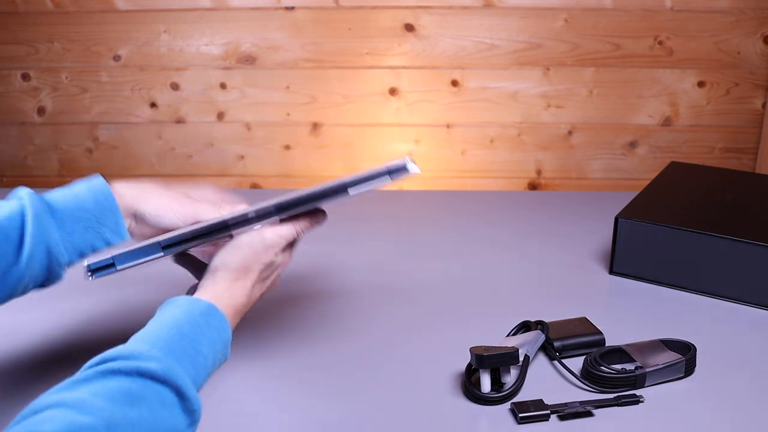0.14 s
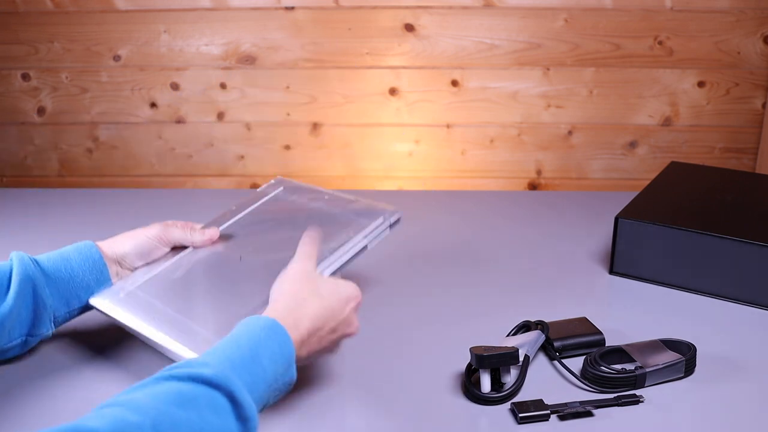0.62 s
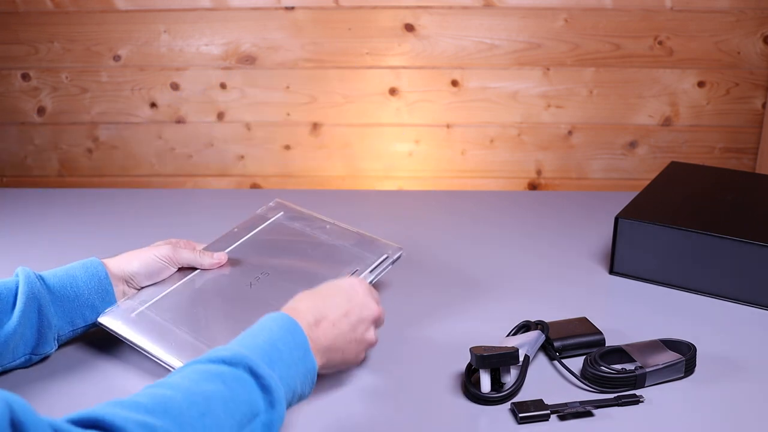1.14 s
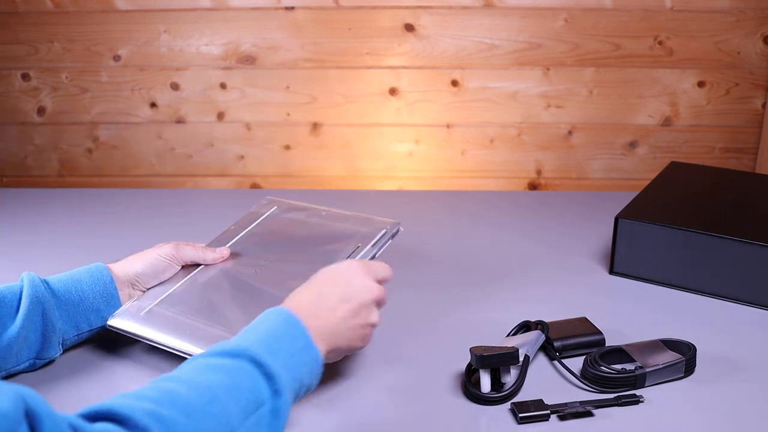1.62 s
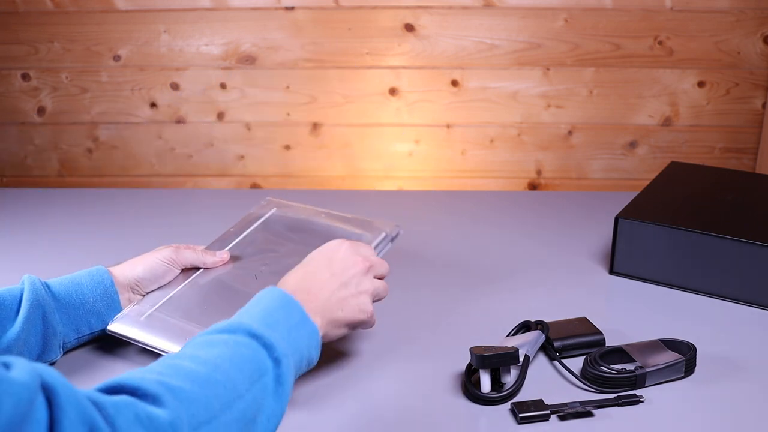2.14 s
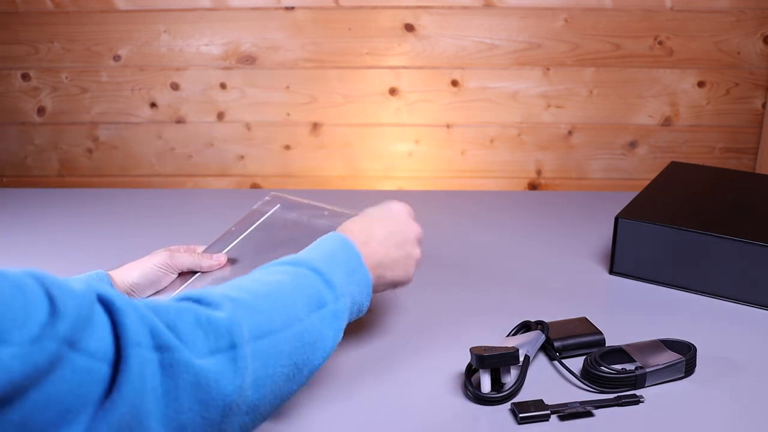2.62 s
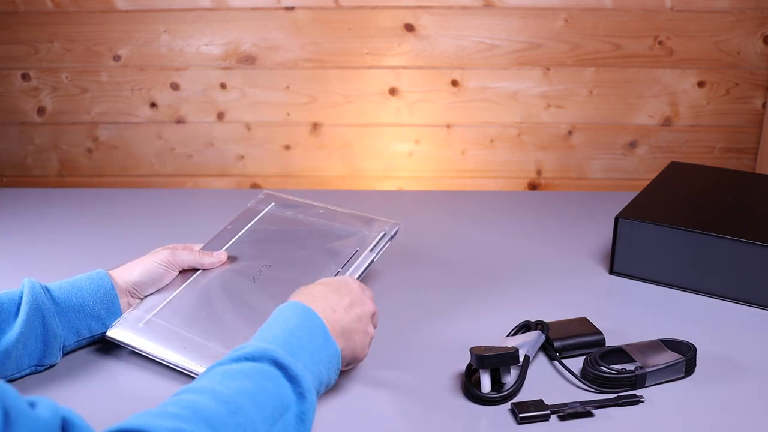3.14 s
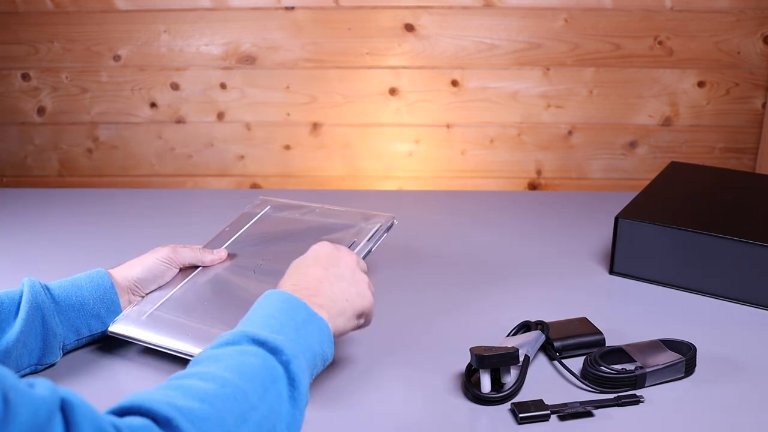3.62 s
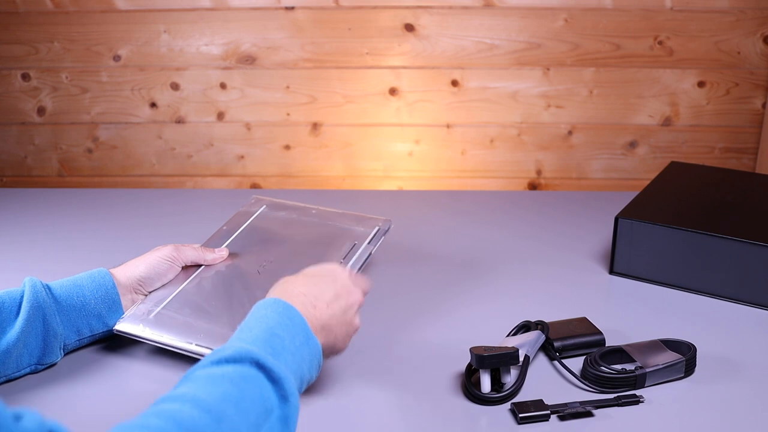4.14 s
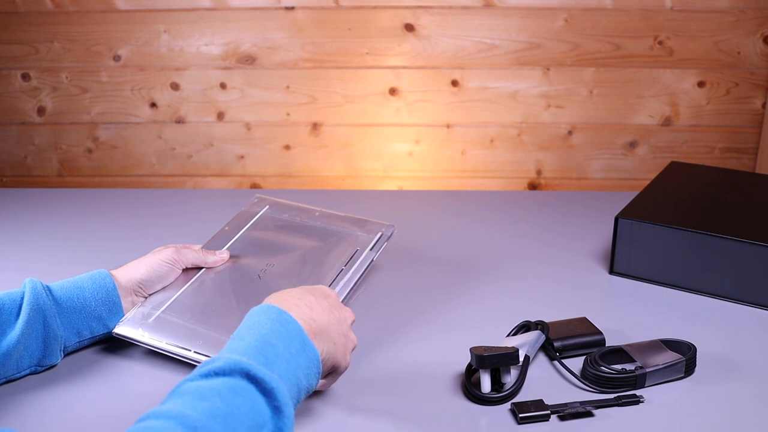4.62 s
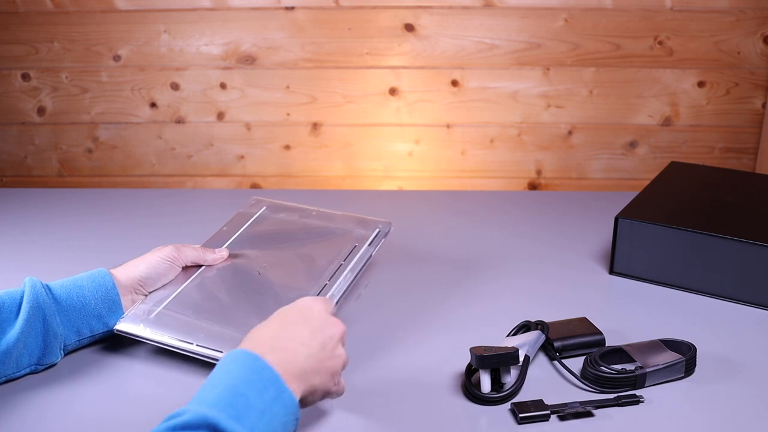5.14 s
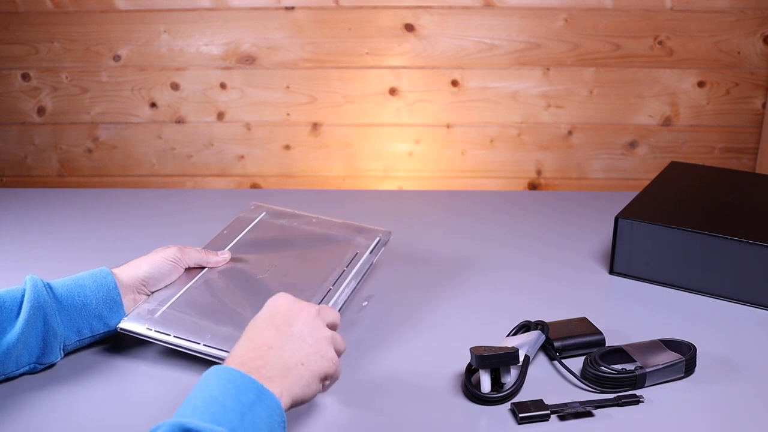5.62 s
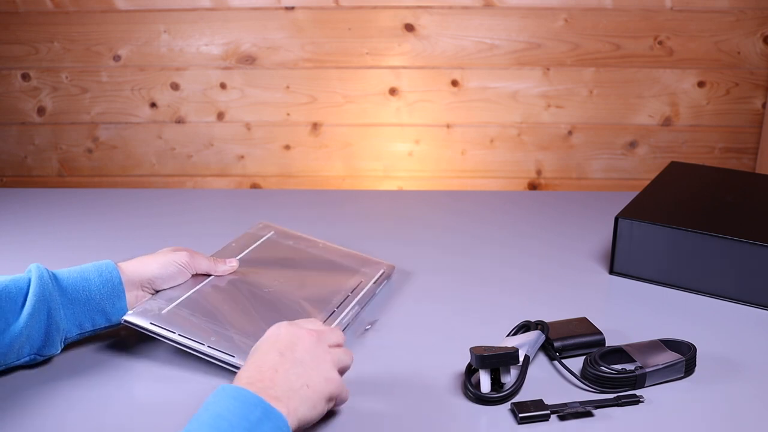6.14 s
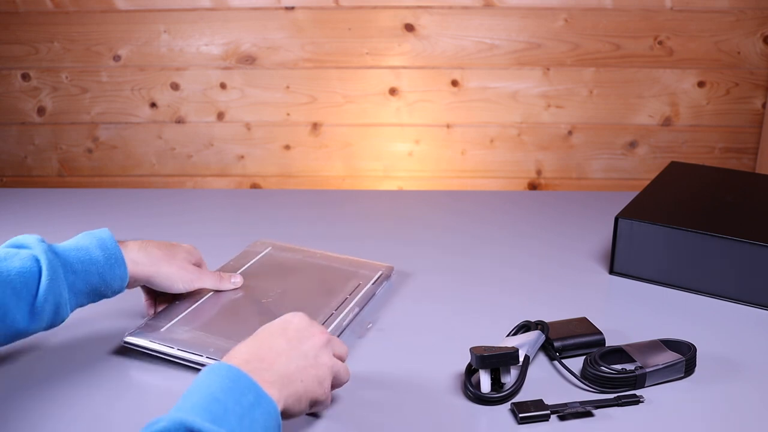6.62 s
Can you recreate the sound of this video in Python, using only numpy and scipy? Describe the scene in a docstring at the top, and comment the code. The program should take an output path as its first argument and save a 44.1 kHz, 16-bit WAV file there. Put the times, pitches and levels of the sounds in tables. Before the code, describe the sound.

Dry, irregular snaps of plastic wrap over faint skin rustle and dull rubbing, with small hollow thumps from the laptop lid. Crackling swells twice, its hardest pops slightly overloading the microphone, then quietens. The laptop edge bumps the table with a few smaller knocks, followed by a soft slide. Close, in a small quiet room.

```python
"""Hands picking at film on a laptop

Hands pick at stiff plastic film wrapped round a slim laptop, over a table in a small wooden room.
Creases snap as coloured noise bursts with a lid thud; fingers and palm hiss as shaped noise over a dull rub;
taps ring the lid's modes, edge knocks ring the table's, and narrow-band noise squeaks.
Walls answer about 5 ms later; the loudest snaps overload the microphone input."""
import sys
import numpy as np
from scipy import signal
from scipy.fft import rfft, irfft, next_fast_len
from scipy.io import wavfile
from scipy.ndimage import uniform_filter1d, map_coordinates

SR = 44100
rng = np.random.default_rng(int(sys.argv[2]) if len(sys.argv) > 2 else 0)


def decibels_to_gain(level_db):
    """Convert a level in decibels to a linear amplitude gain (20 dB per decade)."""
    exponent = np.asarray(level_db, float) / 20
    return 10 ** exponent


def materialize(psi):
    """Save the field psi as 16-bit PCM at rate SR to the path in sys.argv[1].

    A 1-D psi becomes a single channel; in a 2-D psi each row is a channel.
    """
    bounded = np.clip(np.atleast_2d(psi).T, -1, 1)
    quanta = np.round(bounded * 32767).astype(np.int16)
    wavfile.write(sys.argv[1], SR, quanta)


N = 297675  # samples

# Modes of the laptop's lid under the film. Each row: frequency in Hz, relative level in dB, t60 in seconds.
LID_MODES = [(384.5, -3, .028), (635, 4.5, .017), (807, 2, .011), (1096, 1.5, 0.013)]
# Spectrum of skin on film. Each row: frequency in Hz, relative density in dB per Hz.
FILM_SPECTRUM = [(600, -39), (1500, -5), (3000, 3.5), (6000, 3.5), (9000, 0.5), (11000, -0.5),
                 (13500, -1.5), (18000, 13)]


def unit(x):
    """Scales to rms 1."""
    return x / np.sqrt(np.mean(x ** 2) + 1e-20)


def along(points, hz):
    """Reads (Hz, value) points on a log frequency axis."""
    f, v = np.transpose(points)
    return np.interp(np.log(hz + 1), np.log(f + 1), v)


def coloured(x, spectrum):
    """Filters x by a (Hz, dB) spectrum."""
    m = next_fast_len(N + 8192)
    gain = decibels_to_gain(along(spectrum, np.fft.rfftfreq(m, 1 / SR)))
    return irfft(rfft(x, m) * gain, m)[..., :N]


def coloured_noise(spectrum):
    """Steady noise of rms 1 with a (Hz, dB) spectrum."""
    return unit(coloured(rng.standard_normal(N), spectrum))


def wobble(knots_per_s):
    """A smooth random curve through normal knots."""
    knots = rng.standard_normal(int(N * knots_per_s / SR) + 4)
    return map_coordinates(knots, [np.arange(N) * knots_per_s / SR])


def swell(middle_s, length_s):
    """A Gaussian rise and fall, length_s between its 1/e points."""
    t = np.arange(N) / SR
    return np.exp(-((t - middle_s) / (length_s / 2)) ** 2)


def place(seconds, sounds):
    """Sums rows of short sounds onto the time line."""
    at = np.round(seconds * SR).astype(int)[:, None] + np.arange(sounds.shape[1])
    return np.bincount(at.ravel(), sounds.ravel(), N + sounds.shape[1])[:N]


def ring(modes, strengths, attack_s):
    """One row per blow: decaying sine modes at the given strengths, with a soft onset."""
    hz, db, t60_s = np.transpose(modes)[:, :, None]
    t = np.arange(SR // 4) / SR
    onset = 1 - np.exp(-t / attack_s)
    decay = decibels_to_gain(db - 60 * t / t60_s)
    return strengths @ (decay * np.sin(2 * np.pi * hz * t) * onset)


def causal(gain):
    """Minimum phase: the response with this gain that starts no earlier than its cause."""
    cepstrum = irfft(np.log(gain))
    half = cepstrum.shape[1] // 2
    fold = np.r_[1, 2 * np.ones(half - 1), 1, np.zeros(half - 1)]
    return np.exp(rfft(cepstrum * fold))


def room(x):
    """Near walls, each scattering over about a millisecond, plus a tail with a decay per frequency."""
    # Decay of the tail. Each row: frequency in Hz, t60 in seconds.
    tail_decay = [(200, 0.09), (1000, 0.17), (4000, 0.18), (9000, 0.16), (15000, 0.17)]
    # First wall reflections. Each row: delay in seconds, level in dB.
    reflections = [(.0049, -8.5), (.0058, -20), (.0072, -14), (.0084, -9.5), (0.0123, -13), (.0125, -32.5),
                   (.015, -31.5)]
    hz, t, z = signal.stft(rng.standard_normal(SR // 2), SR, nperseg=256)
    decay = decibels_to_gain(-60 * t / along(tail_decay, hz)[:, None])
    tail = signal.istft(z * decay, SR, nperseg=256)[1]
    tail = decibels_to_gain(-4.0) * tail / np.linalg.norm(tail)
    answer = np.pad(tail, (round(0.0045 * SR), 0))
    fade = np.exp(-np.arange(128) / SR / 0.00043)
    for delay_s, db in reflections:
        scatter = fade * rng.standard_normal(len(fade))
        answer[round(delay_s * SR):][:len(fade)] += decibels_to_gain(db) * scatter / np.linalg.norm(scatter)
    return signal.fftconvolve(x, answer)[:N]


def room_from_spots(seconds, sounds, spots):
    """Deals the sounds out over several spots, each with its own room response."""
    return sum(room(place(seconds[k::spots], sounds[k::spots])) for k in range(spots))


def quiet_air():
    """Steady low noise of the quiet room."""
    # Each row: frequency in Hz, relative density in dB per Hz.
    air_spectrum = [(15, -26), (30, 12.5), (60, 4.5), (130, 4.5), (400, -5.5), (900, -35), (1500, -36),
                    (5000, -49)]
    return decibels_to_gain(-56.0) * coloured_noise(air_spectrum)


def rustle_db(s):
    """How busily the fingers move at the given moments, as rustle level."""
    # Each row: time in seconds, rustle level in dB.
    finger_activity = [(0, -56), (.05, -76), (.45, -56), (1.0, -61), (1.32, -62.5), (1.68, -40),
                       (1.76, -44), (2.1, -45.5), (2.45, -46), (2.9, -42.5), (3.3, -51.5), (3.45, -61),
                       (3.72, -74.5), (3.8, -36.5), (4.28, -35.5), (4.43, -56), (4.52, -44.5),
                       (5.18, -46.5), (5.35, -60.5), (5.6, -57.5), (5.88, -49.5), (6.03, -67.5),
                       (6.2, -49.5), (6.74, -49.5)]
    return np.interp(s, *np.transpose(finger_activity))


def finger_rustle(busy_db):
    """Skin sliding on film: hiss with tiny clumped crackles, unevenly loud."""
    happens = rng.random(N) < .004 * decibels_to_gain(4 * wobble(20))
    sizes = decibels_to_gain(2.4 * rng.exponential(size=N))
    crackles = happens * sizes * rng.choice([-1, 1], N)
    hiss = unit(coloured(rng.standard_normal(N) + .5 * unit(crackles), FILM_SPECTRUM))
    uneven_db = 2.2 * wobble(22)
    return decibels_to_gain(busy_db + uneven_db) * hiss


def case_rub():
    """Duller, fluctuating rub of the case, rms 1."""
    # Each row: frequency in Hz, relative density in dB per Hz.
    rub_spectrum = [(100, -32), (250, -6), (600, 0), (1100, -8.5), (2000, -11), (5000, -42.5)]
    return unit(coloured(decibels_to_gain(3.5 * wobble(26)) * rng.standard_normal(N), rub_spectrum))


def taps():
    """Fingertip thumps ring the lid softly; the room answers differently from spot to spot."""
    # Each row: start in seconds, level in dB.
    thump_list = [(.002, -36.5), (0.0653, -46), (0.2757, -28), (.7695, -41.5), (1.67, -31), (1.92, -28.5),
                  (2.076, -27), (2.1015, -20.5), (2.227, -31), (2.4446, -22), (2.5959, -24.5), (2.93, -29),
                  (3.1378, -37), (3.333, -29.5), (3.398, -40), (3.797, -10), (3.8056, -21.5),
                  (3.8572, -11.5), (3.9016, -23.5), (4.015, -25.5), (4.1734, -33.5), (4.7368, -35),
                  (4.8781, -31), (5.099, -37.5), (6.363, -39)]
    s, db = np.transpose(thump_list)
    strengths = decibels_to_gain(3.9 * rng.standard_normal((len(s), len(LID_MODES))))
    thumps = decibels_to_gain(db)[:, None] * ring(LID_MODES, strengths, attack_s=0.001)
    return place(s, thumps) + decibels_to_gain(2.5) * room_from_spots(s, thumps, 5)


def small_creases():
    """Little creases at random moments, rows as in the snap list: busier fingers, stronger pops."""
    count = 260
    floor_db, scatter_db = 4, 9.5  # over the rustle level
    middle_hz, pitch_octaves = 2200, 1.43
    spread_octaves, walls_db = 0.44, 4
    even, normal = rng.random((count, 2)), rng.standard_normal(count)
    s = even[:, 0] * N / SR
    db = rustle_db(s) + floor_db + scatter_db * even[:, 1]
    hz = middle_hz * 2 ** (pitch_octaves * normal)
    same = np.ones(count)
    return np.transpose([s, db, hz, spread_octaves * same, walls_db * same])


def snaps():
    """A crease pops: a millisecond of tiny releases coloured by the film patch, and a thud of the lid."""
    # Each row: start in seconds, pop level in dB, centre in Hz, spread in octaves,
    # relative strength towards the walls in dB.
    crease_list = [(.0663, -36.5, 1030, .83, -6.5), (.2052, -31, 1020, 1.4, -1.5),
                   (0.2748, -13, 1450, 1.86, 3), (.298, -17, 1910, 1.9, 1), (.3987, -34, 7500, .9, 10.5),
                   (0.425, -25, 15290, 1, 8), (0.432, -10, 2830, 1.9, -2.5), (.7695, -39, 980, .3, 10),
                   (1.084, -36, 2200, 0.32, 4.5), (1.3023, -33.5, 15290, 1.45, 11),
                   (1.309, -31.5, 2050, .94, 4), (1.3746, -2.5, 15290, 1.05, 1.5),
                   (1.3789, -2.5, 15200, 1.28, 5.5), (1.383, -10, 7150, .58, 8.5),
                   (1.4072, -19, 9500, .45, 16), (1.4467, -24, 1370, 1.9, 2),
                   (1.4845, -29, 15290, 1.1, 12.5), (1.5577, -35, 2110, .75, 14.5),
                   (1.5647, -14, 3650, 1.17, 3), (1.604, -30.5, 1550, .75, 11.5),
                   (1.639, -21.5, 1250, .34, 4.5), (1.6506, -28, 5400, 0.59, 1.5),
                   (1.674, -24.5, 1166, 1.9, 10.5), (1.7923, -19.5, 3450, 1.2, 2),
                   (1.8331, -22, 1444, 1.2, 1), (1.853, -20, 1730, .6, -2), (1.8922, -25, 1020, .83, 10),
                   (1.918, -18.5, 3280, 1.4, 5.5), (1.9946, -14, 6650, 1.25, 3.5),
                   (2.0245, -7, 6630, .47, 6), (2.0711, -14.5, 1910, 1.4, 2), (2.075, -7.5, 1900, 1.1, -1),
                   (2.092, -2, 2040, 1.86, 6.5), (2.0995, 1.5, 15290, .6, 4), (2.1401, -17, 1020, 1.3, 8.5),
                   (2.2275, -21, 990, .96, 3.5), (2.2334, -16, 6210, .59, 6.5),
                   (2.267, -12.5, 6070, 1.3, 6.5), (2.4434, -19.5, 980, 1.7, 6),
                   (2.5842, -17.5, 5000, 1.2, 3.5), (2.5953, -12.5, 2450, 1.9, 0),
                   (2.6583, -20, 2330, .94, 6), (2.6802, -10.5, 1360, 1.34, 5),
                   (2.769, -32.5, 3080, .86, 13.5), (2.8001, -23.5, 2220, .95, 14),
                   (2.8194, -20.5, 1100, .32, 5.5), (2.837, -26, 4340, .8, 10.5),
                   (2.9217, -20.5, 2680, 1.1, 13.5), (2.928, -18, 1660, 1.55, 11),
                   (2.9392, -18, 2300, 1.9, 12.5), (2.9578, -28, 3100, 0.27, 12),
                   (2.994, -29.5, 2860, .42, 11.5), (3.032, -24, 2700, .56, 4), (3.061, -25, 2700, .79, 1),
                   (3.1373, -27.5, 1180, 1.9, -1), (3.332, -30, 1056, 1.2, 4.5),
                   (3.3486, -22, 5650, .61, 3), (3.5774, -43.5, 1046, .31, 10.5),
                   (3.7724, -50, 990, 1.1, 11.5), (3.791, -7, 3600, .76, 4), (3.7938, -3, 8190, .51, 3),
                   (3.796, 3, 4400, .89, 9.5), (3.8061, -12.5, 944, .52, 10), (3.8364, -6, 4710, 1.4, 3.5),
                   (3.8519, -3, 4420, .75, 11), (3.8575, 6, 3450, 1.9, 7.5),
                   (3.9014, -2.5, 1950, 1.4, -7.5), (3.921, -13.5, 2520, .49, 12),
                   (3.9304, -1.5, 7550, 1.2, 4.5), (3.9668, -20, 4390, .32, -4),
                   (3.9934, -12, 1080, 1.2, 8), (3.9953, -9, 2180, 1.55, 4),
                   (4.014, -21.5, 1090, 1.1, 15.5), (4.0387, -10, 5520, .95, 7.5),
                   (4.1626, -5.5, 3800, 1, 7.5), (4.1735, -16, 4710, .6, 0.5),
                   (4.2713, -24, 1010, 1.2, -4.5), (4.313, -20, 3080, 1.45, 10.5),
                   (4.3164, -14.5, 3820, 1.5, 7), (4.3463, -14, 4140, .71, -5.5),
                   (4.394, -35.5, 1100, .5, -2), (4.4787, -28, 1640, .6, 6), (4.5107, -34, 1020, 1.5, 12),
                   (4.5613, -28.5, 1310, .85, 14.5), (4.5921, -11.5, 2390, .53, 5),
                   (4.5956, -9, 3820, 1.2, 4.5), (4.687, -24, 3820, .85, 9.5),
                   (4.693, -23.5, 3830, .95, -1), (4.737, -36, 1010, .6, -5.5), (4.8424, -9, 2940, .65, 1),
                   (4.8789, -19.5, 1020, 1.2, 5.5), (4.9915, -13.5, 4620, 1.1, 5),
                   (5.0987, -16, 1550, 1.1, 3), (5.1465, -22.5, 4140, .7, 4.5),
                   (5.251, -39, 4520, .7, 11.5), (5.591, -29, 2190, 1.45, -4),
                   (5.5949, -30.5, 3880, .8, 12), (5.849, -28.5, 8000, .8, 8.5),
                   (5.8647, -24.5, 2150, .97, 9), (5.8703, -19, 2640, .42, 3),
                   (6.049, -25.5, 2980, 1.25, 8), (6.2914, -24.5, 2210, .99, 2),
                   (6.5545, -26.5, 1020, .8, 3.5), (6.7165, -35.5, 1000, 1.3, 11.5)]
    s, db, hz, octaves, walls_db = np.vstack([small_creases(), crease_list]).T[:, :, None]
    # thud re pop: broad low creases press the lid, high ones less
    thud_db = -12.5 - 6.5 * np.log2(hz / 1e3) + 0.064 * (db + 19.5)
    t, f = np.arange(512) / SR, np.fft.rfftfreq(512, 1 / SR) + 1
    chance = rng.standard_normal((len(s), len(t) + len(LID_MODES)))
    releases = chance[:, :len(t)] * np.exp(-t / .00058) * (1 - np.exp(-t / .00008))
    skirt = decibels_to_gain(-22)
    hump = np.exp(-(np.log2(f / hz) / np.clip(octaves, .3, 3)) ** 2 / 4) + skirt
    patch = causal(hump / (1 + (700 / f) ** 2))  # a small patch radiates no bass
    pop = irfft(rfft(releases) * patch)
    # level: loudest 0.5 ms rms, times root 2
    pop /= np.sqrt(uniform_filter1d(pop ** 2, size=22, axis=1).max(1, keepdims=True) * 2)
    spread = irfft(patch)  # averaged over all directions only the patch colour is left
    spread *= np.linalg.norm(pop, axis=1, keepdims=True) / np.linalg.norm(spread, axis=1, keepdims=True)
    thud = decibels_to_gain(thud_db) * ring(LID_MODES, decibels_to_gain(6.2 * chance[:, len(t):]), attack_s=0.001)
    longer = ((0, 0), (0, SR // 4 - len(t)))
    direct = decibels_to_gain(db) * (np.pad(pop, longer) + thud)
    outward = decibels_to_gain(db) * (np.pad(spread, longer) + thud)
    echoes = room_from_spots(s[:, 0], decibels_to_gain(walls_db) * outward, 8)
    return place(s[:, 0], direct) + decibels_to_gain(-3) * echoes


def palm_slides(rub):
    """A palm slides smoothly over the film: even hiss, some case rub, and low drag on the table."""
    # Each row: middle in seconds, length in seconds, hiss level in dB.
    slide_list = [(.53, 0.077, -43), (0.898, .08, -52.5), (5.295, 0.069, -47.5), (5.751, .1, -47),
                  (6.296, 0.17, -49.5), (6.445, 0.18, -33.5), (6.62, 0.084, -41), (6.74, .05, -36)]
    # Case dragging on the table. Each row: frequency in Hz, relative density in dB per Hz.
    drag_spectrum = [(15, -3), (35, 0), (60, -8), (120, -30)]
    strength = sum(decibels_to_gain(db) * swell(s, length_s) for s, length_s, db in slide_list)
    hiss = coloured_noise(FILM_SPECTRUM)
    drag = coloured_noise(drag_spectrum)
    return strength * (hiss + decibels_to_gain(-13.5) * rub + decibels_to_gain(-13) * drag)


def squeaks():
    """A fingertip squeaks on the lid: rough stick-slip tones, noise in a narrow band."""
    # Each row: middle in seconds, length in seconds, frequency in Hz, tone rms before the swell in dB.
    squeak_list = [(.535, 0.031, 1172, -45.5), (.535, 0.038, 1760, -50.5), (0.897, 0.045, 1166, -56),
                   (0.949, 0.044, 1050, -48), (1.018, 0.012, 2200, -57)]
    t = np.arange(N) / SR
    total = np.zeros(N)
    for s, length_s, hz, db in squeak_list:
        phase = 2 * np.pi * hz * t
        tone = unit(np.sin(phase) * wobble(300) + np.cos(phase) * wobble(300))
        total += decibels_to_gain(db) * tone * swell(s, length_s)
    return total


def knocks():
    """The laptop's edge bumps the table top; a softer contact wakes only the low modes."""
    # Each row: start in seconds, peak level in dB, contact hardness as cut-off in Hz.
    bump_list = [(1.0983, -21.5, 336), (5.8363, -28, 1480), (5.8395, -5.5, 1210), (5.9158, -13, 960),
                 (5.973, -30.5, 392), (6.078, -36.5, 503), (6.1437, -19.5, 1010), (6.172, -32, 300),
                 (6.187, -24.5, 500), (6.559, -26.5, 600), (6.719, -27.5, 710)]
    # Each row: frequency in Hz, relative level in dB, t60 in seconds.
    table_modes = [(75, -22, .15), (110, -20, .12), (165, -12, .11), (221, -9.5, .16), (250, -1, .014),
                   (328, -14, .06), (450, -10, .035), (657, -6, .035), (867, -4, .012), (1109, -6, .015),
                   (2900, -6, .01)]
    s, db, cut_hz = np.transpose(bump_list)
    reach = 1 / (1 + (np.array(table_modes)[:, 0] / cut_hz[:, None]) ** 2)
    strengths = reach * decibels_to_gain(1.5 * rng.standard_normal(reach.shape))
    blow = ring(table_modes, strengths, attack_s=0.0003)
    # the top is too small to radiate deep bass
    blow = signal.sosfilt(signal.butter(2, 130, 'high', fs=SR, output='sos'), blow)
    return place(s, -decibels_to_gain(db)[:, None] * blow / np.abs(blow).max(1, keepdims=True))


def scene():
    """Sums the sources, their room answers and the quiet air."""
    busy_db = rustle_db(np.arange(N) / SR)
    rub = case_rub()
    rub_db = -37 + .35 * busy_db  # the rub follows the rustle weakly
    hands = finger_rustle(busy_db) + decibels_to_gain(rub_db) * rub + palm_slides(rub) + squeaks()
    bumps = knocks()
    echoes = room(decibels_to_gain(-7.0) * hands + decibels_to_gain(1.0) * bumps)
    return (quiet_air() + hands + taps() + snaps() + bumps + echoes)[None]


def microphone(dry):
    """Microphone frequency response plus steady input hiss."""
    # Each row: frequency in Hz, gain in dB.
    mic_response = [(40, -12.5), (200, -5.5), (4000, 1.5), (8000, 4), (9300, 4), (10500, -4), (13000, 2),
                    (16000, -14.5)]
    # Each row: frequency in Hz, relative density in dB per Hz.
    hiss_spectrum = [(500, -3.5), (1500, -1.5), (5000, 0.5), (11000, -0.5), (16000, -4.5)]
    return coloured(dry, mic_response) + decibels_to_gain(-60.0) * coloured_noise(hiss_spectrum)


def overload(x):
    """The input saturates with a sharp knee near 0.98 of full scale."""
    return x / (1 + np.abs(x / .98) ** 12) ** (1 / 12)


def roll_off(x):
    """The treble ends steeply here."""
    return signal.sosfilt(signal.butter(12, 16380, fs=SR, output="sos"), x)


def record(dry):
    """Microphone colour and hiss, then an overloading input."""
    mix = overload(microphone(dry))
    return roll_off(mix)


dry = scene()
out = record(dry)
materialize(out)
```